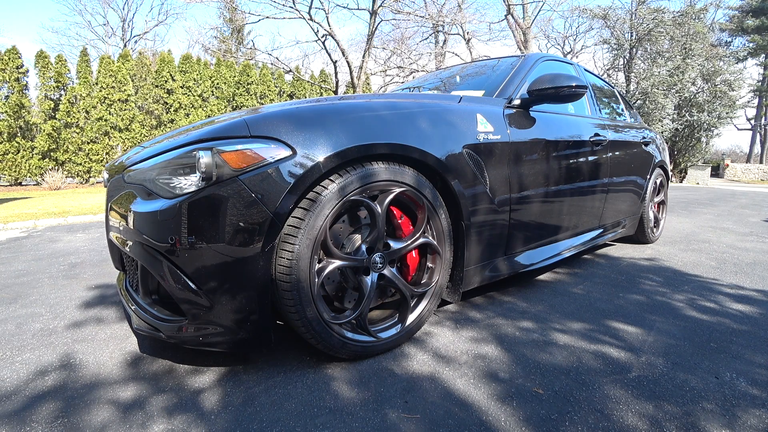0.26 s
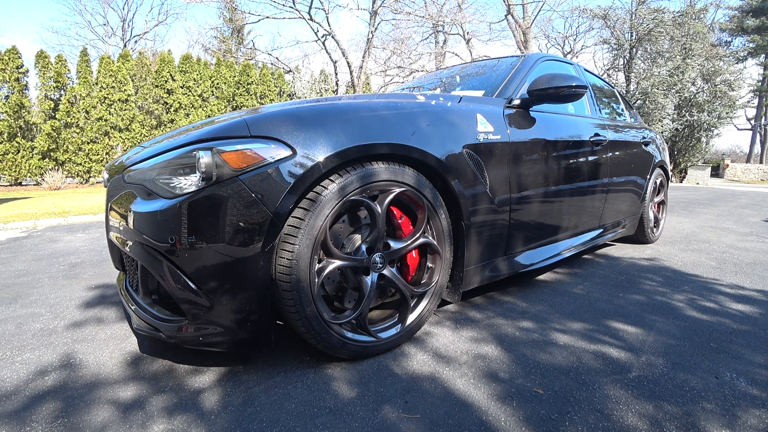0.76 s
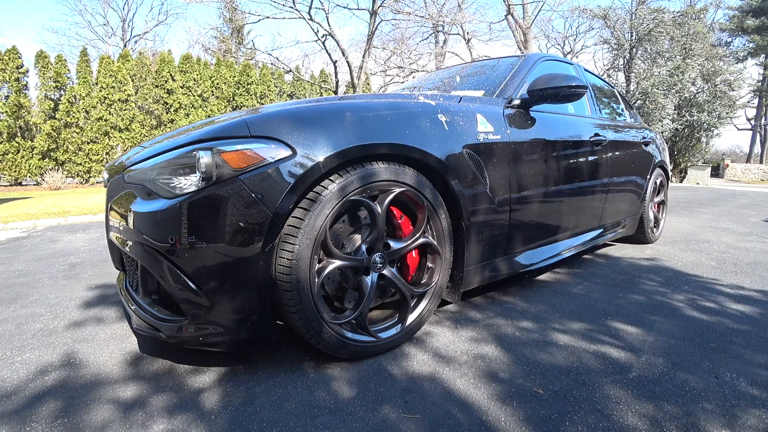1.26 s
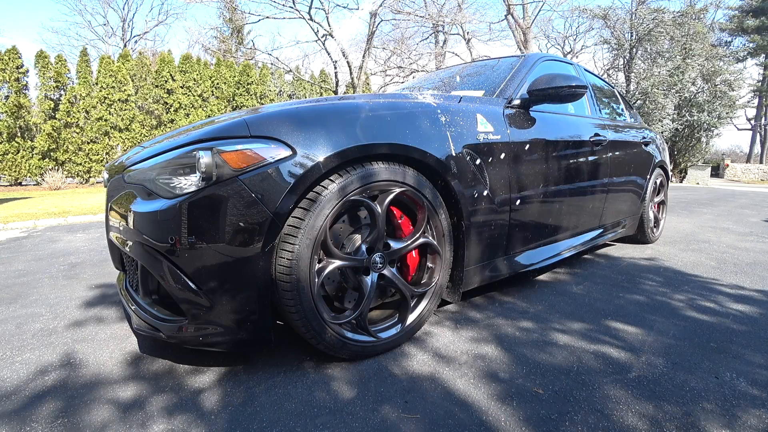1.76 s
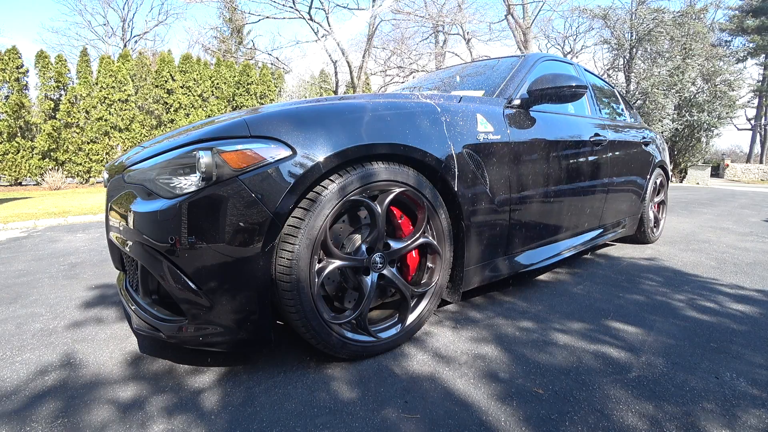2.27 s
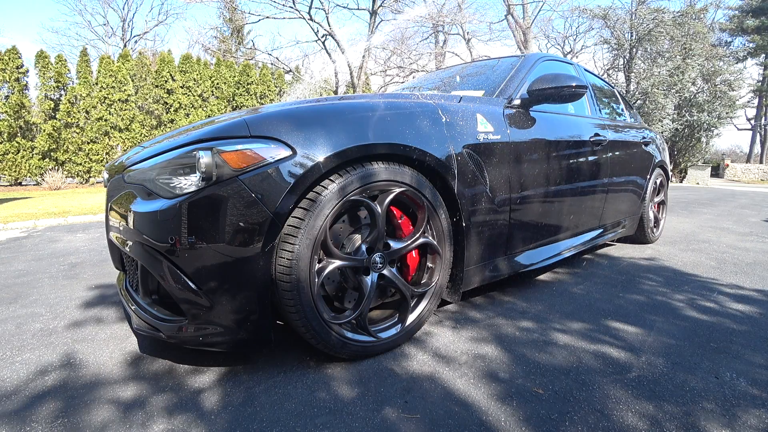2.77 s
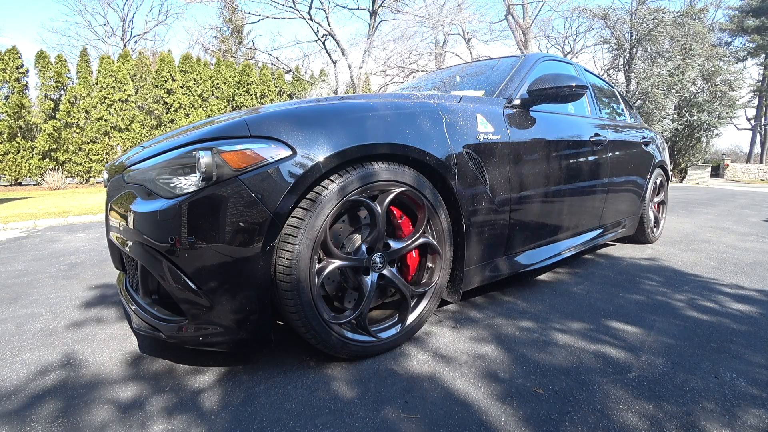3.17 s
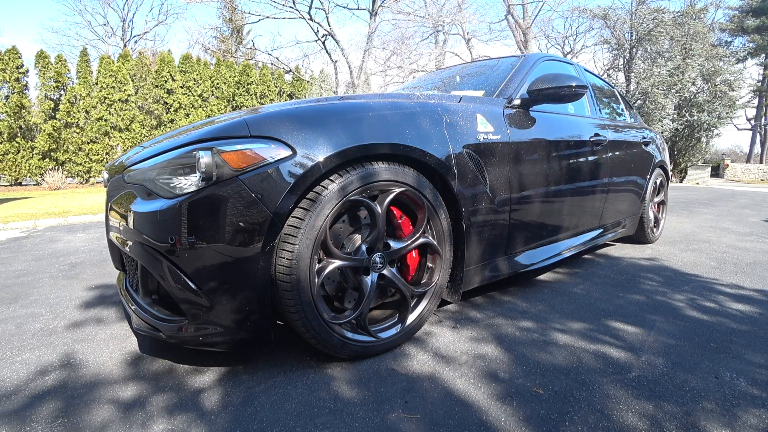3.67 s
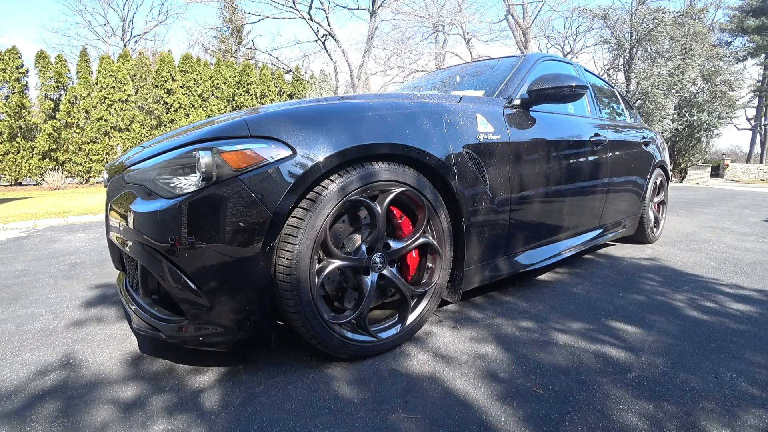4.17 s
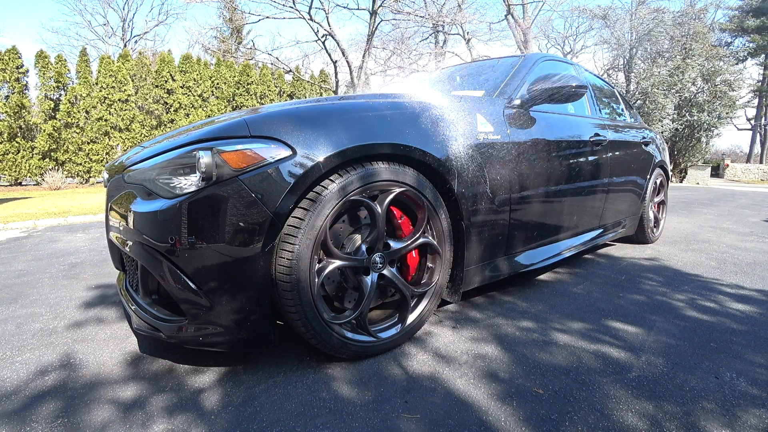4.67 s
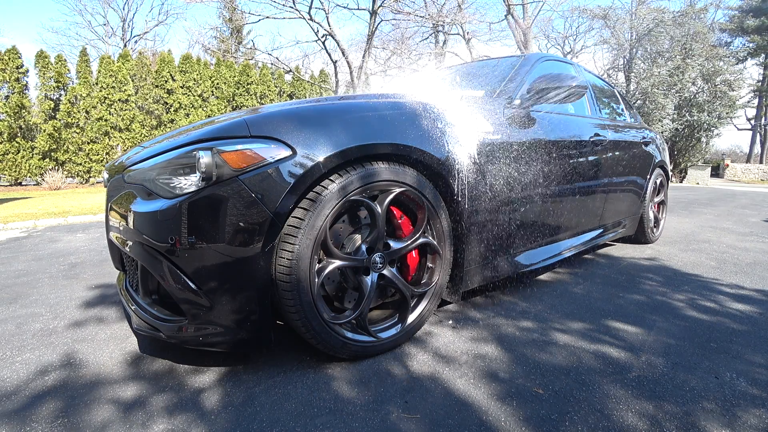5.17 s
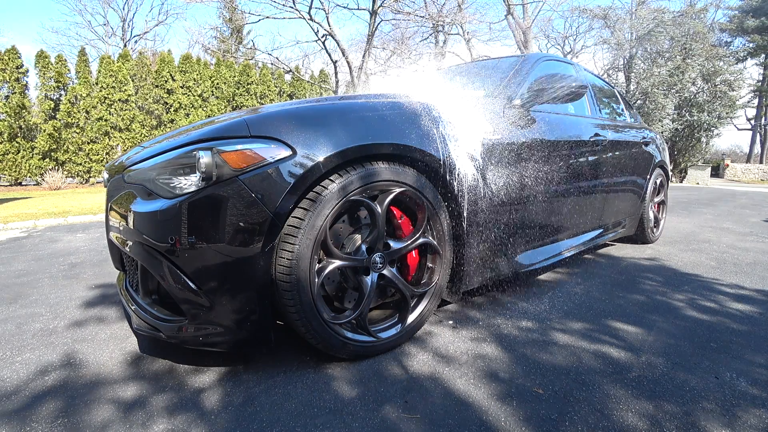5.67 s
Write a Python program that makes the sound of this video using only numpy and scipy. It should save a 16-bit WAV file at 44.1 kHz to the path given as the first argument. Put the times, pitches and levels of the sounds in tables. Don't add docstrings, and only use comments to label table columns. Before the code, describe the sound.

A quiet driveway outdoors: dull distant traffic, a tiny leaf rustle at the start, a short falling bird chirp and a faint rising whistle within the first 0.3 s. At 0.3 s a pressure washer lance opens with a dull pop and a loud, broad hiss, dips near 0.5 s, recovers and is cut off at about 0.67 s with a tick. From 0.7 to 0.87 s the valve gurgles low and hollow, rattles metallically and gives a run of dry ticks, the hardest near 0.85 s, while a faint tube ring dies away. Quiet with traffic, two very faint drips at 1.2 s. At 1.23 s a stronger pop starts the second jet; it sags around 1.45 s, then stays dense and rushing to the end, fluttering finely. Its colour shifts between 2.1 and 2.6 s, and again at 4.3 s, with finer droplet sizzle. Close stereo, thin yard tail, slight low air buffeting.

```python
import sys
import numpy as np
from scipy import signal
from scipy.fft import rfft, irfft, next_fast_len
from scipy.io import wavfile

SR = 44100
rng = np.random.default_rng(int(sys.argv[2]) if len(sys.argv) > 2 else 0)


def generate_wav(signal):
    frames = np.transpose(np.atleast_2d(signal))
    scaled = np.clip(frames, -1, 1) * 32767
    pcm = np.round(scaled).astype(np.int16)
    wavfile.write(sys.argv[1], SR, pcm)


def invert_db(x):
    u = np.asarray(x, float) / 20
    return 10 ** u


N = 261072
T = np.arange(N) / SR
PAD = next_fast_len(N + SR // 2)
HZ = np.arange(PAD // 2 + 1) * SR / PAD + 1e-3

# (path off the car's flank [ms], low hiss [dB], middle [dB], top [dB], fine drops [dB])
STANCES = [
    (3.116, -24.5, -28, -31, -62),
    (3.125, -25, -28.5, -29.5, -58),
    (3.054, -27, -27, -29, -52),
    (2.952, -27.5, -27, -27.5, -48),
]


def rms_one(x):
    return x / np.sqrt(np.mean(x ** 2) + 1e-20)


def at_hz(points, column=1):
    points = np.array(points)
    return np.interp(np.log(HZ), np.log(points[:, 0]), points[:, column])


def drift(rate_hz):
    r = np.exp(-2 * np.pi * rate_hz / SR)
    noise = rng.standard_normal(N + SR)
    return rms_one(signal.lfilter([1], [1, -2 * r, r * r], noise)[SR:])


def ring(clicks, modes):
    out = 0
    for hz, level_db, t60_s in modes:
        r = invert_db(-60 / (t60_s * SR))
        w = 2 * np.pi * hz / SR
        resonator = [1, -2 * r * np.cos(w), r * r]
        out = out + invert_db(level_db) * signal.lfilter([0, np.sin(w)], resonator, clicks + 1e-18)
    return out


def pan(x, left_db):
    return x * invert_db([[left_db / 2], [-left_db / 2]])


def swells(rows):
    return sum(invert_db(db - np.where(T < s, rise * (s - T), fall * (T - s))) for s, db, rise, fall in rows)


def flow():
    # (water arrives [s], air leaks ahead for [s], lowest pressure [s], sag [dB], let go [s])
    pulls = [
        (.302, .032, 0.481, -10, .668),
        (1.2347, .006, 1.455, -9.5, 6.5),
    ]
    leak_from_db, leak_to_db = -42, -6
    sag_fall_s, sag_recover_s = 0.064, 0.047
    rebound_db, rebound_s = 2, 0.031
    slug_s = 0.012
    shut_db, shut_s, bleed_db_per_s = -6, 0.014, 290
    recover_stretch = np.array([[1.01], [1.1], [1.25], [1.45]])
    sag_share = np.array([[0.9], [0.9], [0.85], [1.5]])
    rebound_share = np.array([[1.01], [-0.3], [-0.3], [-0.3]])
    leak_tilt_db = np.array([[0], [8], [6], [1.5]])
    slug_db = np.array([[1.5], [-2], [-4], [-3]])
    bleed_share = np.array([[1.01], [0.95], [1.01], [1.05]])
    out = 0
    for arrives, leak_s, lowest, sag_db, shut in pulls:
        sag_width_s = np.where(T < lowest, sag_fall_s, sag_recover_s * recover_stretch)
        sag = sag_db * np.exp(-((T - lowest) / sag_width_s) ** 2)
        rebound = rebound_db * np.exp(-((T - lowest - 2 * sag_recover_s) / rebound_s) ** 2)
        slug = slug_db * np.exp(-np.abs(T - arrives) / slug_s)
        after = np.maximum(T - shut, 0)
        bleed = shut_db * np.minimum(after / shut_s, 1) - bleed_db_per_s * after
        water = sag_share * sag + rebound_share * rebound + slug + bleed_share * bleed
        ahead = np.clip((arrives - T) / leak_s, 0, 1)
        leak = leak_to_db + (leak_from_db - leak_to_db) * ahead + leak_tilt_db * ahead
        out = out + invert_db(np.where(T < arrives, leak, water)) * (ahead < 1)
    return out


def stance_shares():
    # (start [s], end [s])
    moves = [
        (.9, 0.901),
        (2.1, 2.6),
        (4.29, 4.4),
    ]
    moved = [1] + [np.clip((T - a) / (b - a), 0, 1) for a, b in moves] + [0]
    return np.array([moved[k] - moved[k + 1] for k in range(len(STANCES))])


def hollows(rows, share):
    return np.prod([1 + (invert_db(share * db) - 1) / (1 + 2j * (HZ - hz) / width) for hz, width, db in rows], axis=0)


def paths(echoes):
    size, lead = 2048, 32
    far_echo_gain = 1.37
    left_lag_s = 9e-6
    scatter_db, scatter_t60_s, scatter_from_hz = -5, 0.045, 2500
    echo_cut_hz = 19000
    hz = np.arange(size // 2 + 1) * SR / size
    t = np.arange(size) / SR
    echoes = np.array(echoes)
    shares = echoes[:, 1:].T * np.where(echoes[:, 0] > 2, far_echo_gain, 1)
    copies = shares @ np.exp(-2j * np.pi * np.outer(echoes[:, 0] / 1000, hz))
    scatter = rng.standard_normal((2, size)) * invert_db(-60 * t / scatter_t60_s) * (t > 0.003)
    scatter = invert_db(scatter_db) * scatter / np.sqrt(np.sum(scatter ** 2, axis=1, keepdims=True))
    late = rfft(scatter) / (1 + scatter_from_hz / (1j * hz + 1)) + copies
    r = np.exp(-2 * np.pi * echo_cut_hz / SR)
    dull = (1 - r) / (1 - r * np.exp(-2j * np.pi * hz / SR))
    lag = np.exp(-2j * np.pi * np.outer([lead / SR + left_lag_s, lead / SR], hz))
    return rfft(irfft((1 + dull * late) * lag), PAD)


def jet(gain):
    # (frequency [Hz], left [dB per Hz], right [dB per Hz])
    colour_lows = [(30, -75, -72), (170, -55, -54), (305, -38, -36.5), (513, -34, -30)]
    colour_rest = [(703, -24, -20.6), (978, -15, -12.5), (1510, -13, -0.5), (2500, -20.8, -15),
                   (3670, -20, -11), (6515.9, -18, -14), (8440, -25.5, -19), (11430, -31.5, -30)]
    # (frequency [Hz], share [0-1])
    spread_share = [(200, .25), (600, 0.05), (2500, 0.08), (9000, 0.21)]
    # (frequency [Hz], width [Hz], level [dB])
    bottle_hollows = [(756, 14, 5), (1990, 90, 2.5), (3370, 110, 3), (3690, 100, 2.5), (5440, 130, 3),
                      (5830, 110, 2.5), (6060, 70, 2.2), (6290, 60, 3.5), (6520, 60, 2.5), (6700, 130, 2.5),
                      (7170, 110, 3)]
    # (delay after direct [ms], left share [1], right share [1])
    raised = [(.146, 0.25, 0.085), (.278, 0.34, 0.48), (.378, -0.022, -.27), (.484, 0.14, .05),
              (.556, 0.099, 0.0012), (.683, -0.19, -0.17), (.816, 0.23, 0.061), (.89, 0.082, .15),
              (.93, -.14, -0.05), (1.116, 0.099, 0.12), (1.22, -.12, -0.045), (1.345, 0.13, 0.03),
              (1.7, -0.023, -.05), (2.76, -.13, -0.039)]
    # (delay after direct [ms], left share [1], right share [1])
    lowered = [(.194, -0.04, -0.069), (0.296, 0.16, 0.5), (.406, -0.23, -0.32), (.673, -0.22, -0.22),
               (.726, -0.25, -0.32), (.991, -0.16, -0.091), (1.128, 0.1, 0.13), (1.4, .18, 0.12),
               (1.51, .14, .03), (1.66, 0.16, 0.014), (1.96, .06, .01), (2.4, 0.076, 0.065),
               (2.68, -0.11, -0.047)]
    # (delay from the flank path [ms], left share [1], right share [1])
    flank = [
        (-.085, .13, 0.046),
        (0.001, 0.18, 0.31),
    ]
    # (delay after direct [ms], left share [1], right share [1])
    further = [(3.445, 0.044, 0.07), (3.56, -0.066, -0.036), (3.98, 0.075, 0.068), (4.34, .07, 0.032),
               (4.455, .09, .08), (4.6, 0.055, 0.051), (5.42, 0.065, .05), (6.05, 0.06, .03),
               (6.3, -0.054, -0.034)]
    low_edge_hz, high_edge_hz = 2500, 5000
    finest_hz, valley_hz, valley_width_hz = 7800, 2500, 520

    white = rfft(rng.standard_normal((3, PAD)))
    table = list(colour_lows) + list(colour_rest)
    colour = invert_db([at_hz(table, column=1), at_hz(table, column=2)])
    peaks = [hollows(bottle_hollows, shown) for shown in (0.4, 0.4, 0.9, 1.01)]
    peaks[0] = peaks[0] * hollows([(830, 260, 5)], 1)
    share = np.clip(at_hz(spread_share), 0, 1)
    above_low = 1 / (1 + (low_edge_hz / HZ) ** 12)
    above_high = 1 / (1 + (high_edge_hz / HZ) ** 12)
    registers = [1 - above_low, above_low - above_high, above_high]
    hiss = 0
    near_paths = [raised, raised, lowered, lowered]
    for held, peak, near, stance in zip(stance_shares(), peaks, near_paths, STANCES):
        flank_ms, *levels_db, _ = stance
        off_flank = [(flank_ms + ms, left, right) for ms, left, right in flank]
        echoes = list(near) + off_flank + list(further)
        heard = np.sqrt(1 - share) * paths(echoes) * white[0] + np.sqrt(share) * white[1:]
        heard = colour * peak * heard
        even = 0
        for register, db in zip(registers, levels_db):
            power = 2 * np.sum(abs(register * heard.mean(axis=0)) ** 2)
            even = even + invert_db(db) * register * PAD / np.sqrt(power)
        hiss = hiss + held * irfft(heard * even, PAD)[:, :N]
    finest = 1 / (1 + (finest_hz / HZ) ** 6)
    finest = finest + np.exp(-((HZ - valley_hz) / valley_width_hz) ** 2)
    split = np.array([r * (1 - finest) for r in registers] + [finest])
    low, middle, top, finest = irfft(rfft(hiss, PAD) * split[:, None], PAD)[..., :N]
    surge = drift(8.2)
    out = low * gain[0] * invert_db(0.35 * surge) + middle * gain[1] * invert_db(0.41 * surge)
    return out + (top * gain[2] + finest * gain[3]) * invert_db(0.5 * surge + 0.5322 * drift(25.0))


def spatter(gain):
    drops = (rng.random((2, N)) < 9000 / SR) * rng.standard_normal((2, N))
    level = invert_db(np.array(STANCES)[:, -1] @ stance_shares()) * gain[3]
    bright = signal.butter(2, 7000, "high", fs=SR, output="sos")
    return level * rms_one(signal.sosfilt(bright, drops))


def pops():
    # (time [s], peak [dB])
    slugs = [
        (0.3014, -21),
        (1.2349, -16.5),
    ]
    clicks = np.zeros(N)
    for s, peak_db in slugs:
        clicks[round(s * SR)] = invert_db(peak_db)
    modes = [(478, -18, 0.02), (650, -5, 0.017), (900, -2, 0.016), (1280, -4, 0.01169)]
    return pan(ring(clicks, modes), -2.2)


def valve():
    # (time [s], peak [dB], rise [dB/s], fall [dB/s])
    gurgle_swells = [
        (.728, -33, 350, 250),
        (.764, -39, 700, 550),
        (.80, -57, 300, 200),
    ]
    # (time [s], peak [dB], rise [dB/s], fall [dB/s])
    rattle_swells = [
        (.70, -43, 200, 200),
        (.761, -31, 1200, 650),
        (.786, -46, 900, 500),
        (.858, -55, 400, 160),
    ]
    # (frequency [Hz], level [dB], t60 [s])
    rattle_modes = [(1552, -13, 0.0092), (1960, -1, .012), (2431, -4, .006), (3840, 4, 0.0052),
                    (4900, -1, 0.0046), (7010, -14, .002)]
    # (time [s], peak [dB], left over right [dB])
    tick_events = [
        (.674, -22, 3),
        (.757, -27, 3),
        (.812, -33, 3),
        (.818, -28, 3),
        (.825, -30, 2),
        (0.8388, -25, 1),
        (.8535, -17, -2),
        (.873, -37, 0),
        (1.205, -46.5, -9),
        (1.212, -46, -9),
    ]
    # (frequency [Hz], level [dB], t60 [s])
    tick_modes = [(1950, -6, .010), (2770, -9, 0.0056), (3760, -2, 0.0047), (4600, -6, .003),
                  (7000, -9, 0.0022)]
    # (frequency [Hz], level [dB], t60 [s])
    lance_modes = [(877.5, -38, .88), (1674, -55, .7)]
    # (delay [s], level [dB])
    bounces = [(.0022, -6), (.0041, -13), (.0063, -18)]
    lance_struck_s, tick_cut_hz = 0.762, 1100

    gurgle = ring(rng.standard_normal(N), [(768.0, 5.5, 0.08), (901, -9, 0.0411)])
    gurgle = rms_one(gurgle) * swells(gurgle_swells)
    knocks = (rng.random(N) < 9000 / SR) * invert_db(1.6 * rng.exponential(1, N)) * rng.choice([-1, 1], N)
    rattle = rms_one(ring(knocks, rattle_modes)) * swells(rattle_swells)
    clicks = np.zeros((2, N))
    for s, peak_db, left_db in tick_events:
        clicks[:, round(s * SR)] = pan(invert_db(peak_db + 1.0), left_db)[:, 0]
        for later_s, loss_db in bounces:
            clicks[:, round((s + later_s) * SR)] = pan(invert_db(peak_db + loss_db), left_db)[:, 0]
    clicks = signal.sosfilt(signal.butter(2, tick_cut_hz, "high", fs=SR, output="sos"), clicks)
    ticks = 0.56 * ring(clicks, tick_modes) + 1.6 * clicks
    blow = np.zeros(N)
    blow[round(lance_struck_s * SR)] = 1
    return pan(gurgle, 4.0) + pan(rattle, 4.5) + ticks + pan(ring(blow, lance_modes), 5.9)


def yard(x):
    t60_s, level_db, left_db, cut_hz = 0.7, -23, 3, 2100
    t = np.arange(SR // 2) / SR
    tail = rng.standard_normal((2, SR // 2)) * invert_db(-60 * t / t60_s) * (t > 0.02)
    tail = signal.lfilter([1], [1, -np.exp(-2 * np.pi * cut_hz / SR)], tail)
    tail = tail / np.sqrt(np.sum(tail ** 2, axis=1, keepdims=True))
    tail = pan(tail * invert_db(level_db), left_db)
    return irfft(rfft(x.mean(axis=0), PAD) * rfft(tail, PAD), PAD)[:, :N]


def rumble(gain):
    calm_db, stirred_db, gust_db, stir_s = -80, -69, 2, 0.15
    band = signal.butter(1, [18, 130], "band", fs=SR, output="sos")
    noise = signal.sosfilt(band, rng.standard_normal((3, N)))
    r = np.exp(-1 / (stir_s * SR))
    stirred = signal.lfilter([1 - r], [1, -r], gain[0])
    level = invert_db(calm_db) + invert_db(stirred_db + gust_db * drift(1.5)) * stirred
    return level * rms_one(0.6 * noise[0] + noise[1:] * invert_db([[-1.2], [1.2]]))


def bird():
    # (time [s], length [s], first pitch [Hz], last pitch [Hz], level [dB])
    whistles = [
        (.04, .032, 2480, 2380, -59),
        (.11, .165, 2510, 3170, -68),
    ]
    glide_s, edge_s = 0.025, 0.014
    out = 0
    for s, length_s, first_hz, last_hz, db in whistles:
        u = np.clip(T - s, 0, length_s)
        hz = first_hz + (last_hz - first_hz) * (1 - np.exp(-(u / glide_s) ** 2 / 2))
        edge = np.clip(np.minimum(u, length_s - u) / edge_s, 0, 1)
        phase = 2 * np.pi * np.cumsum(hz) / SR + np.array([[0], [1.5]])
        out = out + np.sqrt(2) * invert_db(db) * edge * np.sin(phase)
    return out


def hedge():
    # (time [s], peak [dB], rise [dB/s], fall [dB/s])
    rustles = [
        (0.0, -57, 500, 110),
        (.09, -72, 600, 600),
    ]
    band = signal.butter(4, [2400, 5100], "band", fs=SR, output="sos")
    leaves = rms_one(signal.sosfilt(band, rng.standard_normal((2, N))))
    return leaves * swells(rustles) * invert_db(4.5 + 2.5 * drift(39.66))


def traffic():
    # (frequency [Hz], level [dB per Hz])
    air_colour = [(20, -26), (141, -7.5), (280, -10), (355, -2.5), (542, -7.5), (872, -3.5), (2260, -15.5),
                  (11000, -34)]
    # (frequency [Hz], likeness [0-1])
    air_likeness = [(60, 0.7947), (220, 1), (820, 0.846), (3050, 0.349), (11300, 0.269)]
    level_db = -55.5
    alike = np.clip(at_hz(air_likeness), 0, 1)
    mid, side = rfft(rng.standard_normal((2, PAD))) * invert_db(at_hz(air_colour))
    air = np.sqrt(1 + alike) * mid + np.sqrt(1 - alike) * side * [[1], [-1]]
    return invert_db(level_db) * rms_one(irfft(air, PAD)[:, :N])


def scene():
    gain = flow()
    no_bass = signal.butter(4, 490, "high", fs=SR, output="sos")
    lance = jet(gain) + signal.sosfilt(no_bass, pops() + valve())
    return lance + yard(lance) + spatter(gain) + rumble(gain) + bird() + hedge() + traffic()


def band_limit(x):
    return signal.sosfilt(signal.butter(12, 11880, fs=SR, output="sos"), x)


def record(dry):
    top_hz = 11030
    rounded = 0.8 * np.tanh(dry / 0.8)
    cut = 1 / (1 + np.minimum(HZ / top_hz, 1.2) ** 1600)
    mix = irfft(rfft(rounded, PAD) * np.sqrt(cut), PAD)[:, :N]
    return band_limit(mix)


dry = scene()
out = record(dry)
generate_wav(out)
```